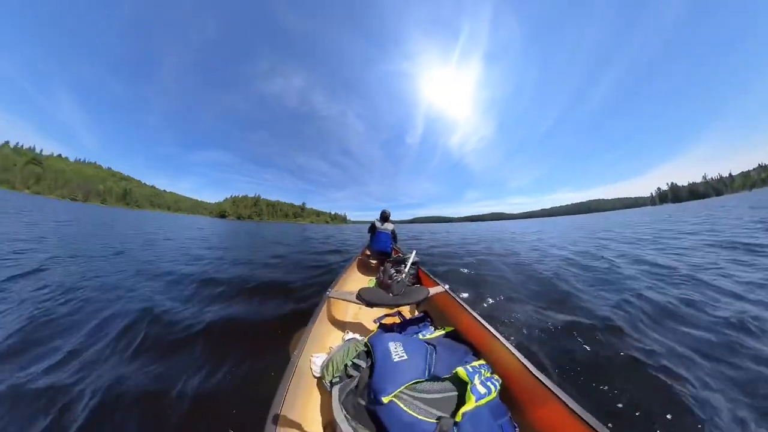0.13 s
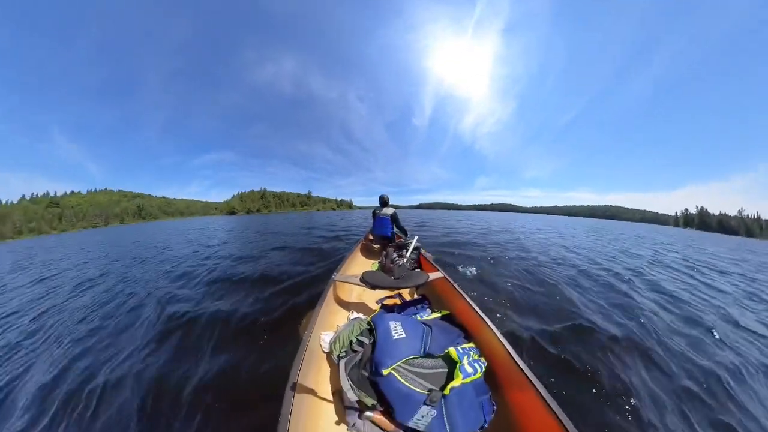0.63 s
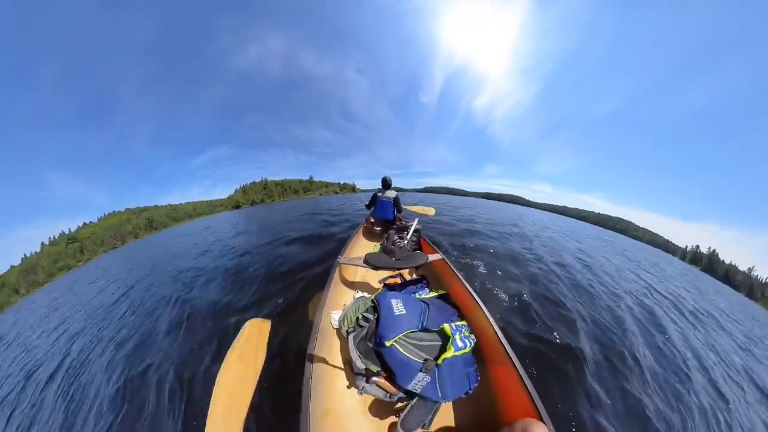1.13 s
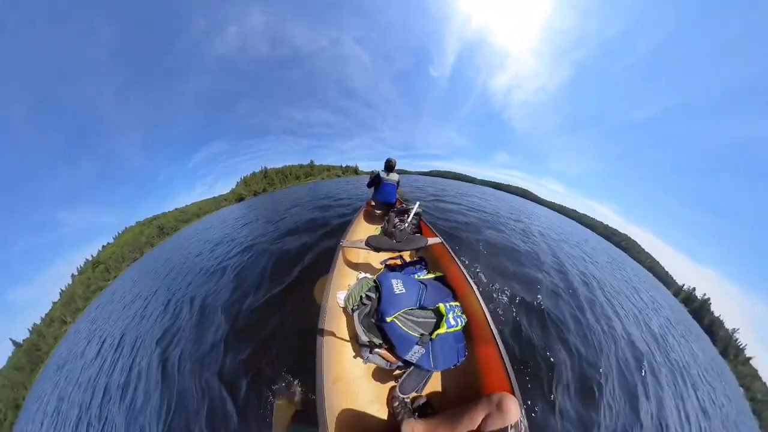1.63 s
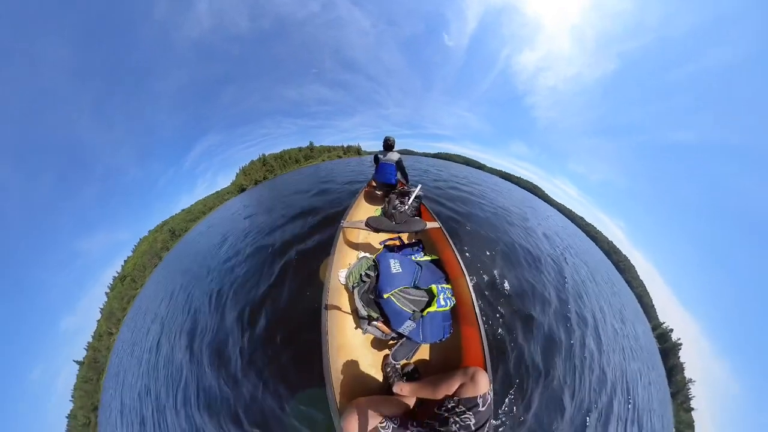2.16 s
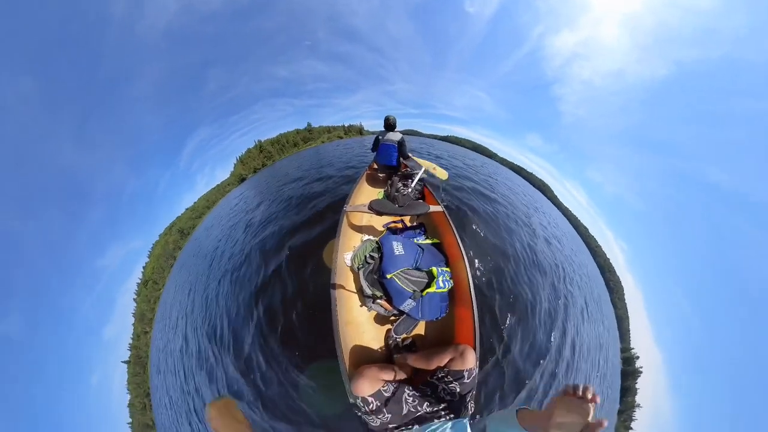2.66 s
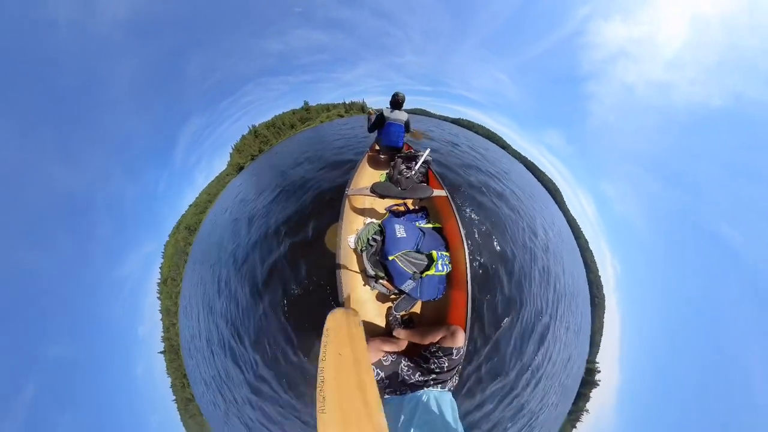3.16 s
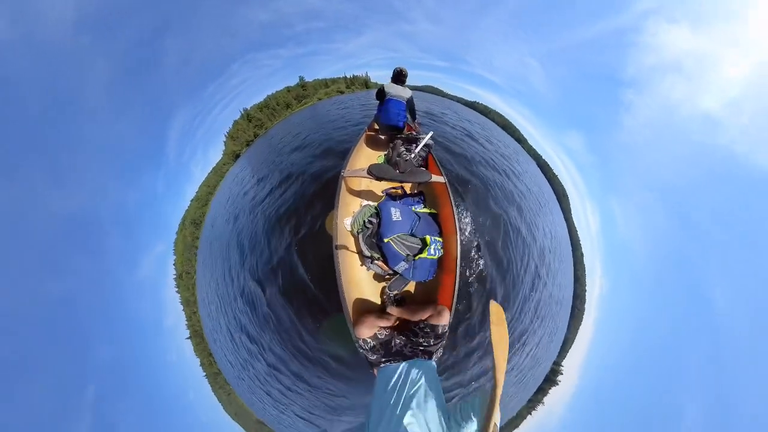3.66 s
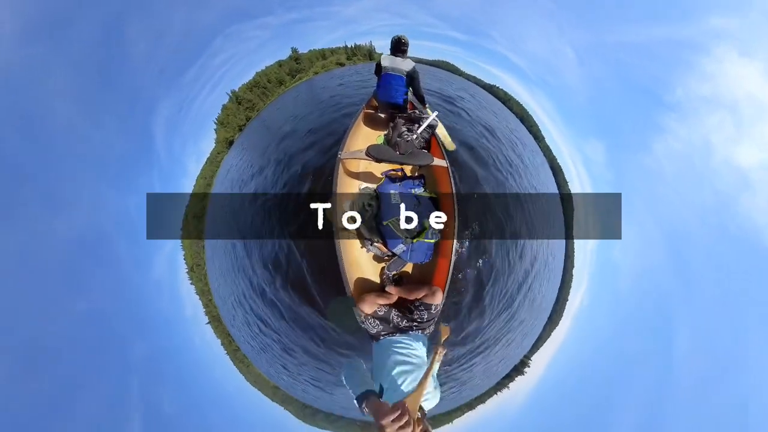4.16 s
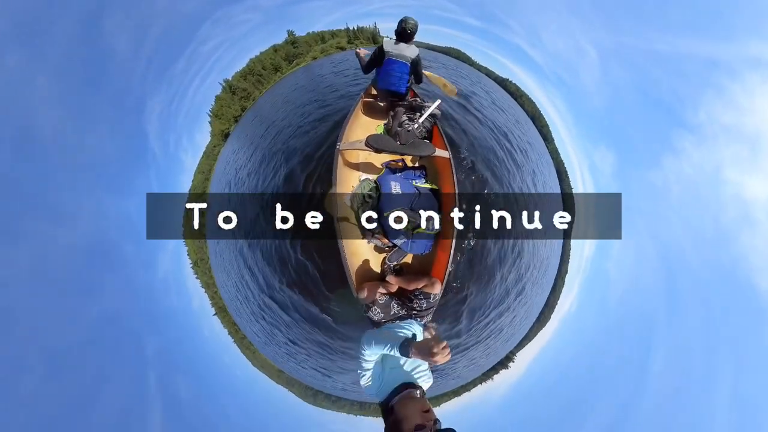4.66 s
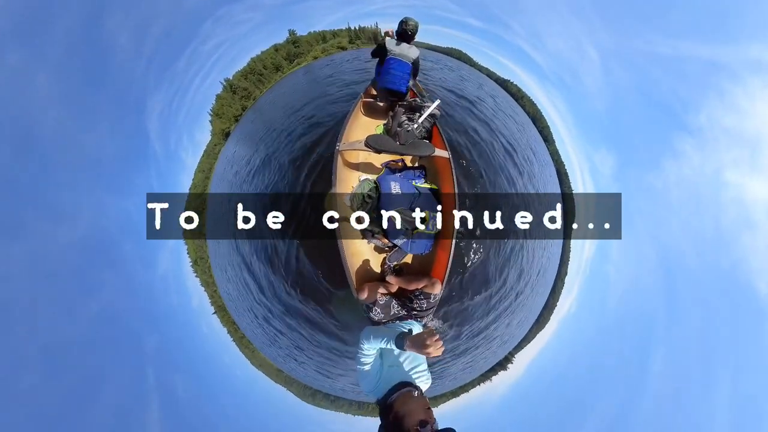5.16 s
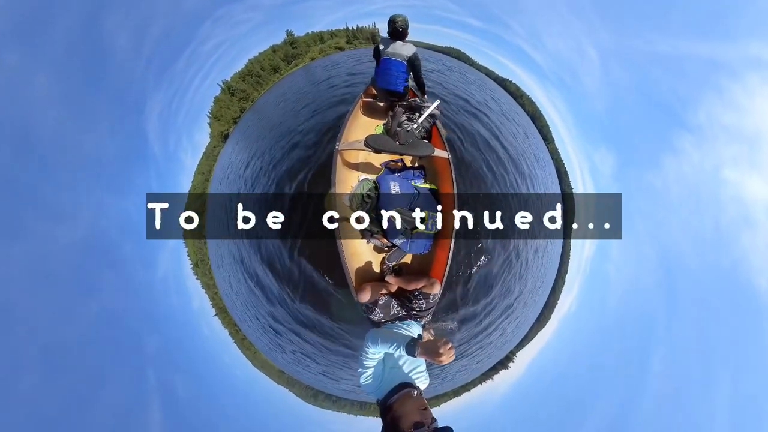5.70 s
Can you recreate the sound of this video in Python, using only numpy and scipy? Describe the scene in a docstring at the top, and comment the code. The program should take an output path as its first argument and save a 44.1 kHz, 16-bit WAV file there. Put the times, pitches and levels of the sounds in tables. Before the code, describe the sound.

On an open lake, a microphone aboard a canoe catches close splashes, gurgling and fizzing spray over a faint wash of distant water. A crisp splash comes early in the second second, a hull knock in the middle, then handling clicks and stronger wind. A heavy hollow thump near the end leaves water sloshing and bubbling.

```python
"""Canoe on a choppy lake

A small two-port microphone rides on board in wind; the near water lies to its left. Far off, the
lake is a wash of noise. Wind is rumble and roar unlike at the two ports, with eddies as short sines.
The housing ticks in noise puffs. Close by, water gurgles, fizzes and sloshes in clouds of small tones,
air pockets ring as gliding sines, splashes and spray are noise puffs, the first with droplet plips.
Waves and paddle knock the hull: pushes ring the decaying modes of its shell."""
import sys
import numpy as np
from scipy import signal
from scipy.fft import rfft, irfft
from scipy.io import wavfile
from scipy.ndimage import uniform_filter1d

SR = 44100
rng = np.random.default_rng(int(sys.argv[2]) if len(sys.argv) > 2 else 0)


def unload_wav(signal):
    """Save mono or channel-first audio to the path in sys.argv[1] as 16-bit WAV at rate SR, clipped to [-1, 1]."""
    wavfile.write(
        sys.argv[1],
        SR,
        np.round(np.clip(np.atleast_2d(signal).T, -1, 1) * 32767).astype(np.int16),
    )


def level_to_linear(level):
    """Convert decibel levels to linear amplitude factors, elementwise."""
    exponent = np.asarray(level, float) / 20
    return 10 ** exponent


N = 256290

# Every colour is a relative spectral density: f/Hz, level/dB per Hz
# far wash of the lake
LAKE_COLOUR = [(18, -23), (30, 21), (88, -7), (227, -5.5), (822, -7), (1760, -21.5), (2750, -13),
               (5900, -22), (12000, -16), (14400, -23), (16000, -27)]
LAKE_DB = -54.5
# left-right likeness of the far lake: f/Hz, likeness (0 to 1)
LAKE_LIKENESS = [(100, 0.048), (300, 0.15), (640, 0.39), (1400, 0.83), (3100, 0.28), (7000, 1),
                 (15000, 0.92)]
# wind on the ports: t/s, level/dB, left minus right/dB
WIND_LEVEL = [(0.0, -36.5, 6), (0.15, -53, -9), (0.5, -52.5, 15), (0.8, -60, -6), (1.1, -70, 0),
              (1.42, -46, -2.5), (1.7, -68, 10), (2.1, -45, -8), (2.4, -93, 2), (2.85, -47.5, 0),
              (3.1, -58.5, -4), (3.5, -46.5, 11), (3.95, -52, 3), (4.12, -30, 3), (4.5, -43.5, 1),
              (4.62, -35.5, -10), (4.74, -26, 0), (5.0, -36.5, -3), (5.1, -44.5, -26.5),
              (5.4, -50.5, -10.5), (5.81, -61.5, -1)]
# low rumble of the wind: f/Hz, level/dB per Hz
RUMBLE_COLOUR = [(12, -50), (20, 1), (82, 6.5), (127, 0), (267, -20.5), (321, -40), (450, -34), (580, -65),
                 (990, -120)]
# higher roar of the wind: f/Hz, level/dB per Hz
ROAR_COLOUR = [(120, -3), (220, -11.5), (330, -6.5), (520, -20.5), (900, -36)]
# eddies striking the ports: onset t/s, peak level/dB, f/Hz, left minus right/dB
EDDIES = [(0.203, -31.5, 117, 28), (0.417, -36, 87, 20), (0.481, -33, 75, 35), (0.598, -31, 103.5, 11),
          (0.914, -44, 70, -26), (1.456, -40.5, 92, -26), (1.784, -33.5, 92.5, 38),
          (2.118, -22.5, 110.5, 25), (2.525, -39.5, 106, 10), (2.794, -37.5, 76, 15),
          (2.848, -39.5, 88, 17), (3.193, -40.5, 65.6, 16), (3.335, -37.5, 104, 28),
          (3.441, -31.5, 65.6, 23), (3.741, -26.5, 111, 40), (3.809, -36.5, 93, 17),
          (4.075, -20.5, 88.7, 19), (4.3, -29.5, 94, -2), (4.625, -28.5, 91, 17), (4.774, -32, 87.4, 3.5),
          (4.89, -22, 148.5, 24), (4.971, -27.5, 210, 20), (4.995, -30, 304, 23), (5.067, -33, 114, -35),
          (5.562, -37.5, 82, -32)]
# ticks of the microphone housing as a hand works the pole: t/s, peak level/dB
TICKS = [(3.979, -31.5), (4.0538, -34), (4.123, -18.5), (4.274, -20.5), (4.332, -32), (4.3504, -32.5),
         (4.439, -7.5), (4.4891, -32.5), (4.574, -32), (4.7133, -11), (4.7898, -26), (4.922, -29),
         (4.9878, -32), (5.1248, -34.5)]
# colour of the housing: f/Hz, level/dB
HOUSING_COLOUR = [(1500, -9), (2600, -7.5), (3600, -2.5), (5300, -4.5), (6400, 2), (7900, -4), (11000, -9),
                  (16000, -14.5)]
TICK_T60_S, DRAG_S, DRAG_BELOW_DB = 0.015, 0.062, -22  # light touches drag on, hard ones snap
# water sloshing under the hull after a heavy blow: onset t/s, level/dB, t60/s
SLOSHES = [(0.0, -40.5, 0.23), (1.779, -52, 0.91), (4.69, -38.5, 2)]
# large low bubbles of the slosh: f/Hz, level/dB per Hz
SLOSH_COLOUR = [(90, -20), (130, -11), (250, -4), (450, -2.5), (800, -16)]
# churn of the water along the hull: t/s, churn level/dB
CHURN = [(0.0, -59), (0.53, -60.5), (0.72, -51.5), (1.0, -57.5), (1.25, -64), (1.42, -45), (1.59, -56),
         (1.7, -49), (2.04, -57), (2.2, -56), (2.79, -55.5), (3.03, -60.5), (4.05, -56.5), (4.15, -71),
         (4.3, -54.5), (4.64, -51.5), (4.73, -45.5), (5.21, -45.5), (5.36, -39), (5.57, -40.5),
         (5.81, -49.5)]
# small bubbles of the gurgle: f/Hz, level/dB per Hz
GURGLE_COLOUR = [(200, -64), (350, -11), (550, 0), (900, -1.5), (1600, 0.5), (3100, -7), (4200, -23.5),
                 (7000, -28)]
# bursting foam: f/Hz, level/dB per Hz
FIZZ_COLOUR = [(2500, -39), (4500, 12), (7200, 21), (9500, 9.5), (13000, 15), (15500, -31), (17000, -42)]
# patches of foam that hiss up and die away: middle t/s, level/dB, length/s (12 dB down at its ends)
FOAM = [(0.0, -51.5, 0.021), (0.302, -65, 0.16), (0.692, -58, 0.12), (1.155, -50.5, 0.14),
        (1.429, -50, 0.23), (1.723, -52, 0.37), (2.8, -60.5, 0.26), (3.142, -53, 0.12),
        (3.324, -54.5, 0.15), (3.684, -56, 0.073), (3.903, -61.5, 0.19), (4.515, -50.5, 0.2),
        (4.9, -57.5, 1), (5.344, -49.5, 0.2), (5.523, -52, 0.2), (5.74, -58.5, 0.081)]
# air pockets ringing: t/s at which the pitch is f, nominal level/dB, f/Hz, rise/octaves per s
BUBBLES = [(0.488, -38, 2720, -14), (0.725, -32.5, 2970, -6), (0.641, -45, 2020, 32),
           (0.738, -35.5, 2460, 17), (0.757, -38.5, 2210, 10), (0.796, -51.5, 428, 13),
           (0.822, -38.5, 641, 22), (0.844, -39, 1058, 23), (0.899, -39, 2820, -1), (0.755, -55, 433, 25),
           (0.89, -50, 1184, 33), (0.918, -51, 974, 25), (0.946, -52, 1190, 3), (1.001, -48.5, 2350, 2),
           (1.022, -47, 1464, 1), (1.383, -46.5, 493, 5), (1.645, -38.5, 2600, 53), (1.708, -32, 1414, 13),
           (1.807, -32, 1740, 24), (1.86, -42.5, 265, 6.5), (1.885, -45.5, 331, 9.5),
           (1.921, -37, 259.7, 2.5), (1.913, -49, 970, -26), (1.909, -34.5, 2520, 12.5),
           (1.951, -39.5, 1320, -10), (1.982, -43.5, 680, 1), (1.995, -48, 301, 11), (2.005, -52, 754, 19),
           (2.02, -46.5, 950, 5), (2.02, -48, 442, 3), (2.048, -34.5, 522, 14.5), (2.069, -39, 450, -2),
           (2.238, -48.5, 1930, 15), (2.253, -45, 1330, -11), (2.295, -41, 1260, -2),
           (2.327, -40, 1650, -8), (2.368, -47, 2950, 15), (2.448, -39.5, 2450, 1), (2.46, -53, 520, 0),
           (2.476, -57, 1850, -2), (2.535, -47, 1035, 13), (2.566, -45, 2030, 5), (2.654, -47, 597, 10),
           (2.73, -48, 1540, -2), (2.885, -49.5, 580, 7), (4.164, -30, 898, 0), (4.205, -45, 1250, -3),
           (4.26, -46, 800, 0), (4.42, -48, 850, 5), (4.481, -41, 1540, -10), (4.538, -44.5, 894, 6),
           (4.646, -34, 1660, 20), (4.752, -33, 828, 0), (4.813, -35, 1560, 9), (4.877, -36, 2010, 2),
           (5.015, -41, 1150, 1), (5.282, -38, 630, 6), (5.363, -37, 1470, -19), (5.547, -33.5, 546, 6),
           (5.66, -42, 820, 6), (5.783, -40.5, 946, -10)]
RING_AT_1K_S, RING_SLOPE = 0.02368, 0.98  # small, high pockets ring shorter
# bright drops of spray: t/s, peak level/dB, centre f/Hz
SPRAY = [(0.654, -36, 12500), (0.653, -36, 4400), (0.677, -32.5, 4840), (1.098, -29, 6300),
         (1.1135, -30, 9600), (1.157, -28, 9500), (1.1705, -37, 12100), (1.444, -19, 10000),
         (1.452, -20.5, 10500), (1.514, -33, 11100), (1.593, -26.5, 8100), (1.634, -35, 12000),
         (1.719, -27.5, 10500), (1.797, -28, 12600), (2.295, -37, 5160), (2.465, -36, 13200),
         (5.065, -27.5, 10800), (5.2785, -35, 12900), (5.324, -24, 4970), (5.328, -15, 9700),
         (5.402, -33, 13600), (5.5455, -30, 13300)]
SPRAY_T60_S, SPRAY_LIKENESS = 0.052, 0.8
# sheets of water thrown up and landing: t/s, nominal level/dB, centre f/Hz, t60/s of the sheet
SPLASHES = [(0.001, -26, 1894, 0.024), (0.573, -40.5, 1420, 0.18), (0.633, -36, 1810, 0.13),
            (0.677, -38, 1315, 0.2), (0.722, -31, 2500, 0.11), (1.375, -19.5, 1724, 0.091),
            (1.408, -32, 1940, 0.05), (1.446, -17.5, 2150, 0.046), (1.454, -17, 2570, 0.069),
            (1.531, -33, 1840, 0.12), (1.632, -27, 2690, 0.15), (1.687, -24.5, 3070, 0.046),
            (1.721, -27, 1640, 0.063), (1.747, -36, 1110, 0.12), (1.805, -24.5, 1780, 0.015),
            (1.816, -31.5, 2060, 0.11), (1.895, -28.5, 1496, 0.025), (2.042, -31.5, 592, 0.039),
            (2.055, -30, 1585, 0.041), (2.292, -37, 1625, 0.081), (2.446, -37, 2960, 0.064),
            (2.467, -38.5, 2970, 0.046), (2.576, -44.5, 2100, 0.05), (3.497, -39.5, 2620, 0.032),
            (4.124, -24, 2090, 0.068), (4.15, -20, 1500, 0.049), (4.29, -30.5, 1103, 0.07),
            (4.359, -27.5, 1115, 0.051), (4.581, -27, 1064, 0.045), (4.803, -26, 1680, 0.092),
            (5.052, -29.5, 1200, 0.23), (5.128, -24.5, 1520, 0.068)]
# knocks on the hull: t/s, peak level/dB, hardness/dB per octave, factor on the ring time
KNOCKS = [(0.001, -26, -5, 1), (0.029, -31.5, -39, 1), (0.279, -31, -6, 0.77), (1.446, -18.5, 21, 0.54),
          (1.836, -26, -8, 0.17), (2.524, -29.5, -1, 0.58), (2.8, -40, -4, 0.5), (3.364, -17, 15, 0.91),
          (3.496, -33.5, 0.5, 0.76), (4.149, -24, -7, 0.58), (4.359, -29.5, -4, 0.84),
          (4.581, -31, -8, 0.92), (4.678, -3.5, 4.5, 0.49), (4.696, -8, -13, 0.95)]
# modes of the shell: f/Hz, level/dB at neutral hardness, t60/s at a ring factor of 1
HULL_MODES = [(149, -18.5, 0.23), (253, 14.5, 0.027), (350, -9.5, 0.051), (402, 3, 0.088),
              (580, 7.5, 0.011), (635, 5, 0.027), (820, 5.5, 0.035), (1058, -12, 0.02), (1330, -15, 0.03),
              (1740, -33, 0.022)]
LEAD_S = 0.00007  # near water reaches the left port first


def evened(x):
    """Scales to rms 1."""
    return x / np.sqrt(np.mean(x ** 2) + 1e-20)


def smoothed(x, size, times=1):
    """Running mean over size samples, repeated."""
    for _ in range(times):
        x = uniform_filter1d(x, size=size)
    return x


def read(points, hz):
    """Value of a table on a log-frequency axis."""
    f, value = np.transpose(points)
    return np.interp(np.log(hz + 1), np.log(f + 1), value)


def curve(rows):
    """Columns of a time table at every sample."""
    s, *columns = np.transpose(rows)
    return [np.interp(np.arange(N) / SR, s, c) for c in columns]


def sides(pan_db):
    """Left and right gain for a level difference; their mean is 1."""
    left = level_to_linear(np.asarray(pan_db))
    return np.array([2 * left / (1 + left), 2 / (1 + left)])


def add(mix, s, sound):
    """Mixes a sound in at a time."""
    part = mix[:, max(round(s * SR), 0):][:, :sound.shape[1]]
    part += sound[:, :part.shape[1]]


def later(pair, s):
    """Delays the right channel by turning the phase of its spectrum."""
    f = np.fft.rfftfreq(pair.shape[1], 1 / SR)
    right = irfft(rfft(pair[1]) * np.exp(-2j * np.pi * f * s), pair.shape[1])
    return np.array([pair[0], right])


def noise(colour, size, patchy_db, same):
    """Two channels of random short-time spectra with drifting patches, at rms 1."""
    frames, hz = 4 * N // size + 5, np.fft.rfftfreq(size, 1 / SR)
    a, b, c, d, patches = rng.standard_normal((frames, len(hz), 5)).T
    patches = uniform_filter1d(patches, size=8, axis=0)
    patches = evened(uniform_filter1d(patches, size=8, axis=1))
    like = np.clip(same(hz), -1, 1)[:, None]
    left = a + 1j * b
    right = like * left + np.sqrt(1 - like ** 2) * (c + 1j * d)
    spectra = np.array([left, right]) * level_to_linear(read(colour, hz)[:, None] + patchy_db * patches)
    return evened(signal.istft(spectra, nperseg=size, noverlap=3 * size // 4)[1][:, :N])


def grains(colour, per_s, cycles, rise, spread_db, count=30):
    """Many short rising tones, each pitch with its own sparse random train and direction, at rms 1."""
    out = np.zeros((2, N))
    for hz in np.geomspace(colour[1][0], 15500, count):
        u = np.arange(int(4 * cycles * SR / hz)) * hz / SR / cycles
        grain = np.sin(2 * np.pi * cycles * u * (1 + rise * u / 4)) * u * np.exp(-2 * u)
        sizes = level_to_linear(spread_db * np.minimum(rng.exponential(1, N), 4))
        train = (rng.random(N) < per_s / count / SR) * sizes
        # equal energy per grain, then the colour over the width that this pitch covers
        grain *= level_to_linear(read(colour, hz)) * np.sqrt(hz) / np.linalg.norm(grain)
        out += sides(2 * rng.standard_normal())[:, None] * signal.oaconvolve(train, grain)[:N]
    return evened(out)


def burst(band, t60, rise_s, like, tail_db, rag_db):
    """A ragged puff of coloured noise that swells to a peak of 1 and dies in two stages."""
    t = np.arange(4096) / SR
    a, b, rag = rng.standard_normal((3, len(t)))
    spectra = rfft([a, like * a + np.sqrt(1 - like ** 2) * b])
    puff = evened(irfft(spectra * band(np.fft.rfftfreq(len(t), 1 / SR) + 1)))
    ragged = level_to_linear(rag_db * evened(smoothed(rag, 90)))
    after = np.maximum(t - rise_s, 0)
    fade = level_to_linear(-60 * after / t60) + level_to_linear(tail_db - 60 * after / 0.12)
    puff = puff * ragged * np.minimum(t / rise_s, 1) ** 2 * fade
    return puff / abs(puff).max()


def hump(hz, octaves):
    """A broad band around one pitch."""
    return lambda f: 1 / (1 + (np.log2(f / hz) / octaves) ** 6)


def unlike(hz):
    """Likeness of wind at the two ports: none, as each port has its own turbulence."""
    return 0 * hz


def near(hz):
    """Likeness of close water at the two ports: high at every pitch."""
    return 0.88 + 0 * hz


def lake():
    """Far waves: a smooth wide wash of noise, more or less alike at the ports by frequency."""
    return level_to_linear(LAKE_DB) * noise(LAKE_COLOUR, size=1024, patchy_db=2.5, same=lambda hz: read(LAKE_LIKENESS, hz))


def wind():
    """Turbulence at each port: a lumpy rumble, and a roar that gains on it as the wind hardens."""
    lumps = np.array([evened(smoothed(v, 1200)) for v in rng.standard_normal((2, N))])
    rumble = noise(RUMBLE_COLOUR, size=2048, patchy_db=2.0, same=unlike) * level_to_linear(2.5 * lumps)
    mid_db, pan_db = curve(WIND_LEVEL)
    level_db = np.array([mid_db + pan_db / 2, mid_db - pan_db / 2])
    # the harder it blows, the higher the sound reaches
    roar_gain = level_to_linear(1.235 * level_db - 5.5 + 4.2 * lumps)
    roar = roar_gain * noise(ROAR_COLOUR, size=1024, patchy_db=4.5, same=unlike)
    return level_to_linear(level_db) * evened(rumble) + roar


def eddies():
    """Single eddies thump the ports: pressure swings of a cycle or two with a rough edge."""
    out = np.zeros((2, N))
    for (s, db, hz, pan), draw in zip(EDDIES, rng.standard_normal((len(EDDIES), 4096))):
        turns = np.arange(len(draw)) * hz / SR
        u = turns / 1.42
        stray = 0.11 * evened(smoothed(draw, 140, times=3))  # wandering phase, in turns
        eddy = (u * np.exp(1 - u)) ** 2 * np.sin(2 * np.pi * (turns + stray + draw[0]))
        add(out, s, level_to_linear(db) * sides(pan)[:, None] * eddy)
    return out


def ticks():
    """Short scrapes carried through the housing, the same at both ports."""
    out = np.zeros((2, N))
    colour = lambda f: level_to_linear(read(HOUSING_COLOUR, f))
    for s, db in TICKS:
        t60 = TICK_T60_S + DRAG_S * (db < DRAG_BELOW_DB)
        scrape = burst(colour, t60, rise_s=0.006, like=1.0, tail_db=-15, rag_db=3.5)
        add(out, s - 0.004, level_to_linear(db) * scrape)
    return out


def slosh():
    """Large low bubbles under the hull, loud at first, dying away."""
    t = np.arange(N) / SR
    level = sum((t >= s) * level_to_linear(db - 60 * np.maximum(t - s, 0) / t60) for s, db, t60 in SLOSHES)
    colour = SLOSH_COLOUR + [(1500, -54)]
    return level * grains(colour, per_s=2800, cycles=4.2, rise=0.094, spread_db=8.0)


def gurgle():
    """Small bubbles and churn along the side, each bubble a short rising tone."""
    churn_db, = curve(CHURN)
    bubbling = 0.56 * grains(GURGLE_COLOUR, per_s=2500, cycles=7.5, rise=0.037, spread_db=4.9)
    # scattered drips ring longer and follow the churn more weakly
    drips = grains(GURGLE_COLOUR, per_s=200, cycles=9, rise=0.06, spread_db=3)
    drips *= level_to_linear(0.6 * churn_db - 32)
    # strong churn melts into a dense wash
    wash = level_to_linear(0.3 * churn_db + 9) * noise(GURGLE_COLOUR, size=512, patchy_db=5, same=near)
    spurts = evened(smoothed(rng.standard_normal(N), 900, times=2))
    return level_to_linear(churn_db + 2.2 * spurts) * (bubbling + wash) + drips


def foam():
    """Level of the fizz: each patch swells and fades as a bell."""
    t = np.arange(N) / SR
    return sum(level_to_linear(db) * np.exp(-(2.39 * (t - s) / length) ** 2) for s, db, length in FOAM)


def fizz():
    """Bursting foam: very short grains over patchy hiss, coming in spurts."""
    clicks = 0.71 * grains(FIZZ_COLOUR, per_s=3400, cycles=0.41, rise=0.14, spread_db=6.0)
    hiss = 1.51 * noise(FIZZ_COLOUR, size=256, patchy_db=8.5, same=near)
    spurts = evened(smoothed(rng.standard_normal(N), 900, times=2))
    return foam() * level_to_linear(3 * spurts) * (clicks + hiss)


def bubbles():
    """Air pockets ring as wavering, gliding sines with a quick start and a slower fade."""
    out = np.zeros((2, N))
    for (s, db, hz, rise), draw in zip(BUBBLES, rng.standard_normal((len(BUBBLES), 3, 6000))):
        length = RING_AT_1K_S * (hz / 1e3) ** -RING_SLOPE
        t = np.arange(-length / 3, length, 1 / SR)[:6000]
        waver = evened(smoothed(draw[:2], 300, times=2))[:, :len(t)]
        # a pocket that climbs fast swells on the way up
        u = (t / length + 1 / 3) / (0.14 + 0.0056 * max(rise, 0))
        pitch = hz * 2 ** (rise * t + 0.018 * waver[0])
        tone = np.sin(2 * np.pi * np.cumsum(pitch) / SR)
        tone *= u * np.exp(1 - u) * level_to_linear(db + 1.8 * waver[1])
        add(out, s - length / 3, sides(-1.5 + 3.5 * draw[2, 0])[:, None] * tone)
    return out


def spray():
    """Bright drops patter: short ragged puffs, each in a narrow band."""
    out = np.zeros((2, N))
    for s, db, hz in SPRAY:
        drop = burst(hump(hz, 0.43), SPRAY_T60_S, rise_s=0.0049, like=SPRAY_LIKENESS, tail_db=-19, rag_db=6.0)
        add(out, s - 0.004, level_to_linear(db) * drop)
    return out


def droplets(hz, t60, count):
    """A shower of short gliding plips scattered around one pitch, thinning out with time."""
    out = np.zeros((2, 6000))
    for when, pitch, size, pan, glide in rng.random((count, 5)):
        plip_hz = hz * 2 ** (1.8 * pitch - 0.9)
        u = np.arange(0, 4, plip_hz / SR / 7)  # one unit is seven cycles
        plip = np.sin(2 * np.pi * 7 * u * (1 + (0.05 * glide - 0.02) * u)) * u * np.exp(1 - 2 * u)
        s = 0.5 * t60 * when ** 2
        level = level_to_linear(-60 * s / t60 - 10 * size)
        add(out, s, level * sides(3.9 * (pan - 0.5))[:, None] * plip)
    return out


def splashes():
    """Sheets of water land as ragged mid-range puffs under showers of droplets."""
    out = np.zeros((2, N))
    for s, db, hz, t60 in SPLASHES:
        sheet = burst(hump(hz, 0.7), t60, rise_s=0.0028, like=0.9, tail_db=-26, rag_db=4.5)
        add(out, s - 0.002, level_to_linear(db - 2) * sides(-1.5)[:, None] * sheet)
        add(out, s, level_to_linear(db - 5) * droplets(hz, 2 * t60 + 0.04, count=28))
    return out


def hull():
    """A soft push and a dying rattle ring the modes of the shell; hard knocks favour the high modes."""
    out = np.zeros((2, N))
    t = np.arange(SR // 4) / SR
    for (s, db, hard_db, ring_factor), draw in zip(KNOCKS, rng.standard_normal((len(KNOCKS), 2, 2000))):
        ring = np.zeros(len(t))
        for hz, mode_db, t60 in HULL_MODES:
            level_db = mode_db + hard_db * np.log2(hz / 500) - 60 * t / (t60 * ring_factor)
            ring += level_to_linear(level_db) * np.sin(2 * np.pi * hz * t)
        # the rattle is partly shared by the two sides
        pushes = level_to_linear(-23.5 - 60 * t[:2000] / (0.12 * ring_factor)) * (draw[0] + 2.7 * draw)
        pushes[:, 0] = 0.52  # the first push
        soft = signal.fftconvolve(pushes, signal.windows.hann(17)[None], axes=1)
        knock = signal.fftconvolve(soft, ring[None], axes=1)
        add(out, s, level_to_linear(db) * sides(-4.0)[:, None] * knock / abs(knock).max())
    return out


def scene():
    """The far lake, wind and housing at the ports, and the close water and hull led by the left port."""
    close = slosh() + gurgle() + fizz() + bubbles() + spray() + splashes() + hull()
    return lake() + wind() + eddies() + ticks() + later(close, LEAD_S)


def low_pass(x):
    """Removes everything above the highest recorded frequency."""
    return signal.sosfilt(signal.butter(12, 16200, fs=SR, output="sos"), x)


def record(dry):
    """The microphone's bass cut against wind, then the upper band edge."""
    bass_cut = signal.butter(3, 55.0, "high", fs=SR, output="sos")
    band_edge = signal.butter(10, 16400.0, fs=SR, output="sos")
    mix = signal.sosfilt(band_edge, signal.sosfilt(bass_cut, dry))
    return low_pass(mix)


dry = scene()
out = record(dry)
unload_wav(out)
```